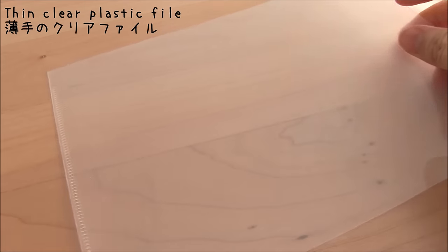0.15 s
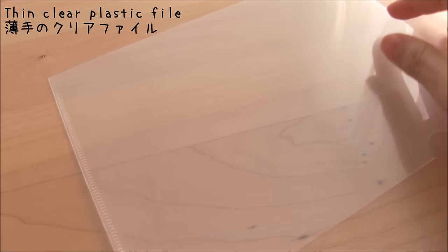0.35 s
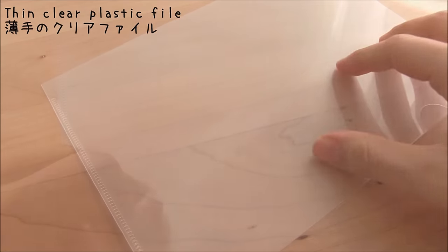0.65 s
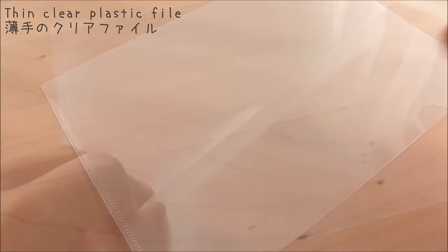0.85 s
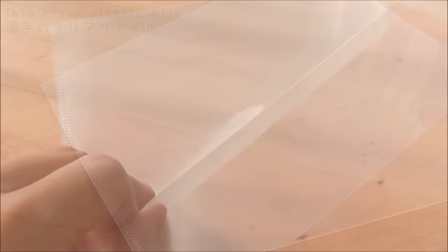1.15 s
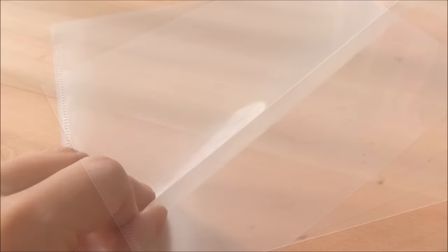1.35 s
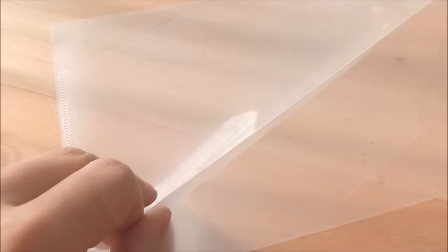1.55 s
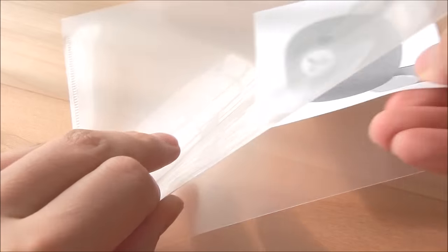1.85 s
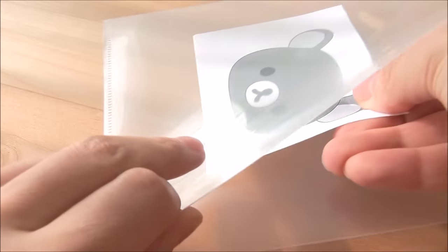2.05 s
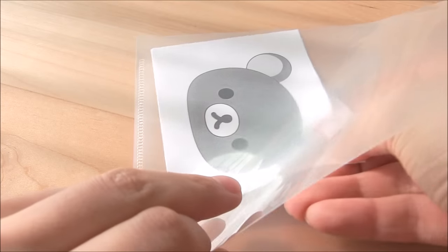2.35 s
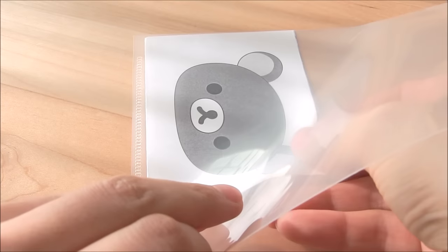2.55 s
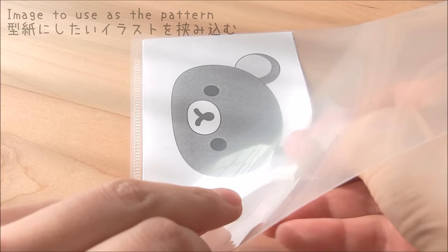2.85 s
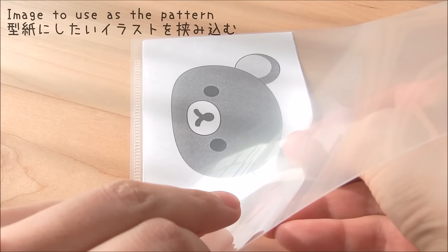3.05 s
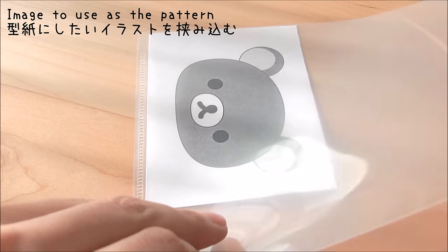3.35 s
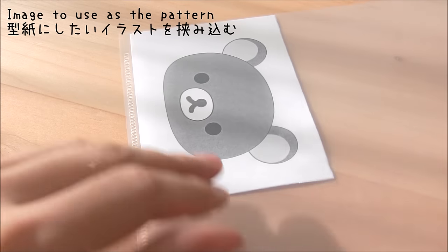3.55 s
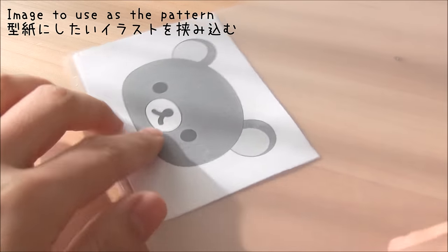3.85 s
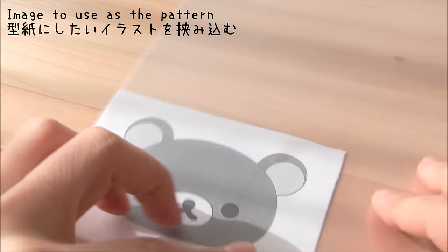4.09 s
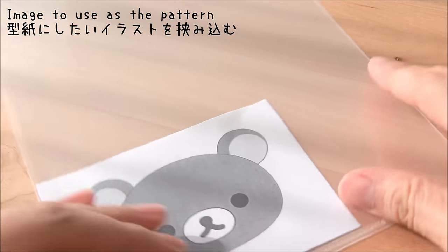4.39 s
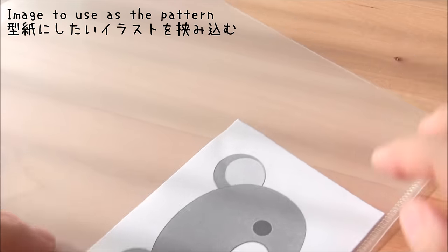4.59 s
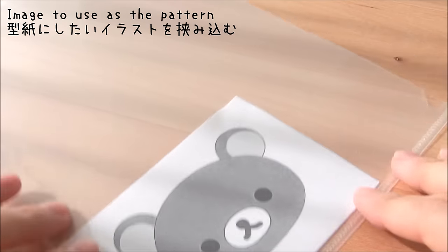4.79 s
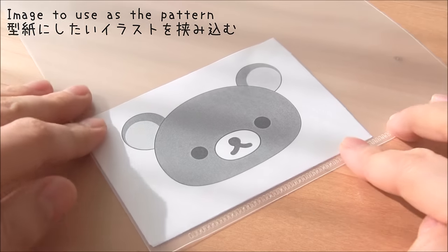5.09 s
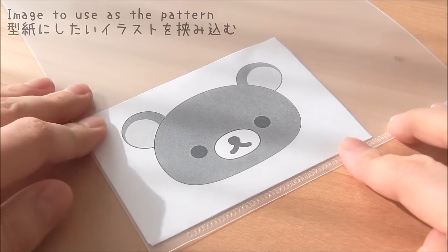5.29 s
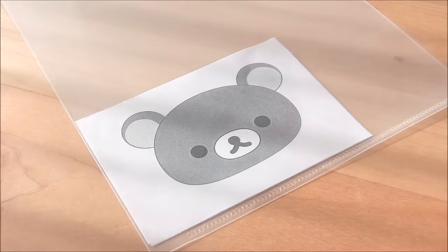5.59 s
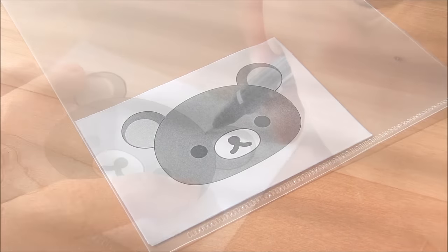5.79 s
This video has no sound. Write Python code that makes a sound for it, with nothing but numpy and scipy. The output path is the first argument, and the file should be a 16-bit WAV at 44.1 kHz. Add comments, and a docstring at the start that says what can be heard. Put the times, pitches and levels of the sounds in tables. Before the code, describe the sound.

A thin plastic folder snaps and ticks on a wooden table, paper slides in with a hiss, loud cracks follow, then soft swishes.

```python
"""A thin clear plastic folder is lifted open on a wooden table: the film snaps as it buckles, ticks at its
edges and rustles where its leaves rub, all as bursts of damped modes and filtered friction noise.
A sheet of paper then slides in, scraping and hissing; louder snaps follow as the folder is let go, and
gliding swishes of resonant noise turn it round on the wood, until one faint last brush.
Thuds ring the table top, a small room answers with decaying noise, and a soft hiss lies under it all."""
import sys
import numpy as np
from scipy import signal
from scipy.fft import rfft, irfft, next_fast_len
from scipy.io import wavfile
from scipy.ndimage import map_coordinates

SR = 44100
rng = np.random.default_rng(int(sys.argv[2]) if len(sys.argv) > 2 else 0)


def to_wav(s):
    """Save 16-bit WAV."""
    ch = np.atleast_2d(s).T  # columns
    pcm = np.round(np.clip(ch, -1, 1) * 32767)  # PCM
    wavfile.write(sys.argv[1], SR, pcm.astype(np.int16))


N = 261503

# left-right correlation of sounds by default: (frequency [Hz], correlation [0-1])
NEAR_CORRELATION = [(60, 1), (250, 0.8), (600, 0.53), (1500, 0.87), (4000, 0.76), (12000, 0.72)]


def from_db(db):
    """Amplitude gain is ten to the power of the level over twenty."""
    return 10 ** (np.asarray(db) / 20)


def rms_one(x):
    """Normalise to unit mean power."""
    return x / np.sqrt(np.mean(x ** 2) + 1e-20)


def at_hz(points, hz):
    """Interpolate a table linearly over log frequency, as octaves are spaced."""
    freqs, values = np.transpose(points)
    return np.interp(np.log(np.maximum(hz, 1)), np.log(freqs), values)


def panned(x, pan_db):
    """Intensity stereo: a level difference, left over right, leans the sound to one side."""
    return x * from_db([[pan_db / 2], [-pan_db / 2]])


def add(out, s, sound):
    """Superposition: sum a sound into the mix from a given time [s]."""
    at = max(round(s * SR), 0)
    out[:, at:at + sound.shape[-1]] += sound[..., :N - at]


def stroke(start, end, rise_s, fall_s):
    """Envelope of one movement: a sine-squared rise from the start, a hold until the end, then a fall."""
    t = np.arange(N) / SR
    ramp = np.minimum((t - start) / rise_s, 1 - (t - end) / fall_s)
    return np.sin(np.pi / 2 * np.clip(ramp, 0, 1)) ** 2


def resonate(x, hz, width_hz):
    """A damped mode: a two-pole resonance with unit gain at its peak."""
    r = np.exp(-np.pi * width_hz / SR)
    zeros = np.array([1, 0, -1]) * (1 - r * r) / 2
    poles = [1, -2 * r * np.cos(2 * np.pi * hz / SR), r * r]
    return signal.lfilter(zeros, poles, x)


def coloured(pair, colour, tilt_db=0, correlation=NEAR_CORRELATION):
    """Mid-side mixing turns two unrelated signals into a partly correlated, filtered stereo pair; rms 1."""
    length = pair.shape[-1]
    size = next_fast_len(length)
    hz = np.arange(size // 2 + 1) * SR / size
    alike = np.clip(at_hz(correlation, hz), 0, 1)
    # the tilt [dB per octave] acts above 500 Hz
    gain = from_db(at_hz(colour, hz) + tilt_db * np.log2(np.maximum(hz, 500)))
    mid, side = rfft(pair, size) * gain
    both = np.sqrt(1 + alike) * mid + np.sqrt(1 - alike) * side * [[1], [-1]]
    without_rumble = both * hz / (hz + 20)
    return rms_one(irfft(without_rumble, size)[:, :length])


def friction(size, slips_per_s, spread_db, smooth):
    """Stick-slip noise: random slips of uneven strength over the smooth noise of countless smaller ones."""
    happens = rng.random((2, size)) < slips_per_s / SR
    strength = from_db(spread_db * np.minimum(rng.exponential(1, (2, size)), 3))
    slips = happens * strength * rng.choice([-1, 1], (2, size))
    return rms_one(slips) + smooth * rng.standard_normal((2, size))


def judder(per_s, depth_db):
    """Amplitude modulation: the random gain of a surface that grips and lets go."""
    knots = rng.standard_normal(N)
    return from_db(depth_db * np.interp(np.arange(N) * per_s / SR, np.arange(N), knots))


def shifting(x, per_s, per_octave, depth_db):
    """Time-varying filtering: contact wanders over the bent film, so patches of the spectrum swell and fade."""
    hz, s, spectrum = signal.stft(x, SR, nperseg=256)
    places = np.meshgrid(np.log2(1 + hz / hz[1]) * per_octave, s * per_s, indexing="ij")
    patches = map_coordinates(rng.standard_normal((64, 1024)), places, order=1, mode="wrap")
    return signal.istft(spectrum * from_db(depth_db * patches), SR)[1][:, :N]


def pop(hz, share, order=2):
    """Impulse response of cascaded modes, of width share * hz: a swing that builds and dies; peak 1.

    A higher order is rounder."""
    swing = signal.unit_impulse(SR // 5) + 1e-18
    for _ in range(order):
        swing = resonate(swing, hz, share * hz)
    return swing / np.abs(swing).max()


def air(low_db=-60.5, lift_db=7):
    """Stationary filtered noise: a soft background hiss that moves smoothly between two levels."""
    # stretches at the higher level: (start [s], end [s], rise [s], fall [s])
    lifts = [(.3, 2.98, 0.31, 0.59), (5.65, 5.93, .025, .1)]
    # spectrum: (frequency [Hz], relative density [dB])
    hiss_colour = [(15, -38), (25, -12), (70, -10.5), (166, -6), (217, 0), (293, -5), (394, -4), (476, -7),
                   (591, -5.5), (863, -10), (1610, -11), (3920, -17), (7510, -20.5), (13600, -26.5),
                   (16000, -31.5)]
    # left-right correlation of the diffuse hiss: (frequency [Hz], correlation [0-1])
    diffuse_correlation = [(60, .5), (200, 0.38), (450, 0.05), (1300, 0.18), (4400, 0.58), (12000, .6)]
    lifted = sum(stroke(*lift) for lift in lifts)
    hiss = coloured(rng.standard_normal((2, N)), hiss_colour, correlation=diffuse_correlation)
    return from_db(low_db + lift_db * lifted) * hiss


def room(x, first_s=0.0028, build_s=0.00084):
    """Reverberation as convolution with diffuse noise, each octave with its own exponential envelope."""
    # time for a 60 dB decay; a negative one makes the top octave grow until the response ends:
    # (frequency [Hz], time [s])
    decay_times = [(100, 0.63), (400, 0.2), (1200, 0.17), (3000, 0.78), (6000, 0.5), (11000, -2)]
    # strength of the echo: (frequency [Hz], level [dB])
    echo_levels = [(100, -15.5), (300, -1), (700, -5.5), (1400, -9), (3000, -18.5), (6000, -9.5),
                   (14000, -22)]
    t = np.arange(SR * 2 // 3) / SR
    edges = 62.5 * 2. ** np.arange(9)
    build = 1 - np.exp(-np.maximum(t - first_s, 0) / build_s)
    echo = 0
    for low, high in zip(edges, edges[1:]):
        hz = np.sqrt(low * high)
        noise = coloured(rng.standard_normal((2, len(t))), [(1, 0), (SR, 0)])
        fade = from_db(-60 * t / at_hz(decay_times, hz)) * build
        band = signal.sosfilt(signal.butter(2, [low, high], "band", fs=SR, output="sos"), noise)
        echo = echo + band * fade / np.sqrt(np.sum(fade ** 2)) * from_db(at_hz(echo_levels, hz))
    return signal.fftconvolve(x, echo, axes=1)[:, :N]


def thuds(contact_s=0.0082):
    """Modal synthesis: soft blows of fingers and folder set the decaying modes of the table top ringing."""
    # blows: (time [s], level [dB])
    blows = [(.066, -50), (.752, -45), (2.338, -36.5), (2.386, -41), (3.258, -47), (3.474, -51),
             (3.998, -49), (4.21, -37.5), (5.068, -59)]
    # modes of the table top: (frequency [Hz], relative level [dB], time for a 60 dB decay [s])
    modes = [(100, -14, 0.16), (136, -7, 0.31), (183.3, -9, 0.3), (231.7, 2.5, 0.14), (287.4, -6.5, .12),
             (350, 0.5, .07)]
    out, t = np.zeros((2, N)), np.arange(SR // 3) / SR
    ring = 0
    for k, (hz, db, t60) in enumerate(modes):
        sign = (-1) ** k
        ring = ring + sign * from_db(db - 60 * t / t60) * np.sin(2 * np.pi * hz * t)
    for s, db in blows:
        add(out, s, from_db(db) * ring * (1 - np.exp(-t / contact_s)))
    return out


def landings(pan_db=0):
    """A lightly damped mode: film that drops flat cushions on the air under it and rings on one note."""
    # (time [s], peak level [dB], pitch [Hz], width [Hz])
    drops = [(.492, -57.5, 990, 45), (3.54, -44.5, 968, 26), (4.2113, -43.5, 1080, 140)]
    out = np.zeros((2, N))
    for s, db, hz, width_hz in drops:
        add(out, s, panned(from_db(db) * pop(hz, width_hz / hz), pan_db))
    return out


def turning(width_hz=800, skirt_hz=2600, edge_hz=2900, side_db=-8, pan_db=-1):
    """Heterodyned friction: film skims the wood grain in swishes of gliding pitch over a soft hiss."""
    # shoves: (start [s], end [s], swish level [dB], hiss level [dB], first pitch [Hz], last pitch [Hz])
    shoves = [(3.852, 3.99, -61.5, -65.5, 3860, 3455), (3.96, 4.189, -67, -57, 5200, 4930),
              (4.248, 4.39, -53, -54.5, 4850, 4520), (4.431, 4.502, -55, -59, 3950, 3730),
              (4.56, 4.639, -54, -59.5, 4150, 4190), (4.782, 4.978, -50, -53, 4350, 4386),
              (5.011, 5.101, -54.5, -57.5, 4330, 4200)]
    # spectrum of the hiss: (frequency [Hz], relative density [dB])
    wood_colour = [(70, -22), (128, 11.5), (165, 3), (230, 4), (400, -15), (800, -5.5), (1100, -0.5),
                   (2300, -3), (5000, 2.5), (7500, 3.5), (11000, -0.5), (16000, -8.5)]
    rise_s, fall_s = 0.048, 0.11
    random_phase = np.exp(2j * np.pi * rng.random(N))
    slips = friction(N, slips_per_s=1800, spread_db=3.5, smooth=0.79) * random_phase
    # every slip rings briefly; the carrier below moves the ring to the pitch of the moment
    rings = signal.lfilter(*signal.butter(2, skirt_hz, fs=SR), slips)
    rings = signal.lfilter(*signal.butter(1, width_hz / 2, fs=SR), rings)
    hiss = coloured(friction(N, slips_per_s=4500, spread_db=4.5, smooth=1.0), wood_colour)
    # the thin film radiates little below its edge pitch
    radiation = signal.butter(4, edge_hz, "high", fs=SR, output="sos")
    out, grip = 0, judder(per_s=42, depth_db=0.6)
    for start, end, swish_db, hiss_db, first_hz, last_hz in shoves:
        pitch = np.interp(np.arange(N) / SR, [start, end], [first_hz, last_hz])
        carrier = np.exp(2j * np.pi * np.cumsum(pitch) / SR)
        mid, side = np.real(rings * carrier)
        swish = signal.sosfilt(radiation, mid + from_db(side_db) * side * [[1], [-1]])
        rubbing = from_db(swish_db) * rms_one(swish) * grip + from_db(hiss_db) * hiss
        out = out + stroke(start, end, rise_s, fall_s) * rubbing
    return panned(out, pan_db)


def brushes(ring_share=0.17, ring_db=5, pan_db=-1):
    """Resonant friction: two leaves graze in swelling strokes and the bend of the film favours one pitch."""
    # (strongest time [s], rise [s], fall [s], relative level [dB], tilt [dB per octave], ring pitch [Hz])
    grazes = [(.02, 0.088, 0.054, -41, 2.5, 3420), (.239, 0.03, 0.11, -54.5, -1, 3220),
              (.39, 0.02, .032, -59.5, 1.5, 9500), (2.566, .03, .054, -50, 2.5, 2860),
              (2.75, 0.052, 0.052, -53, 2, 3500), (2.831, 0.051, 0.04, -48.5, 2.5, 3970),
              (3.201, 0.035, .03, -53, 1, 4200), (3.228, 0.017, 0.05, -44, 4, 4550),
              (3.318, .045, 0.035, -45.5, 0, 2090), (3.48, .04, 0.058, -45.5, 0.5, 3400),
              (3.524, 0.04, 0.017, -42.5, 2.1, 1440), (5.49, 0.019, 0.054, -60, 5, 3940)]
    # spectrum before the tilt: (frequency [Hz], relative density [dB])
    graze_colour = [(60, -14), (150, 7), (500, 1), (1300, 0.5), (2000, 1), (3400, -4), (5000, -6.5),
                    (8000, -10.5), (12000, -17), (16000, -30)]
    out, size = np.zeros((2, N)), SR // 4
    for top, rise, fall, db, tilt_db, ring_hz in grazes:
        t = max(top - rise, 0) + np.arange(size) / SR
        swell = np.sin(np.pi / 2 * np.interp(t - top, [-rise, 0, fall], [0, 1, 0]))
        slips = friction(size, slips_per_s=3000, spread_db=4.0, smooth=0.61)
        graze = coloured(slips, graze_colour, tilt_db)
        ring = from_db(ring_db) * resonate(graze, ring_hz, ring_share * ring_hz)
        add(out, t[0], from_db(db) * swell * rms_one(graze + ring))
    return panned(out, pan_db) * judder(per_s=140, depth_db=2.25)


def paper(catch_db=1, catch_hz=3000, catch_width_hz=1500, pan_db=-1.5):
    """Stick-slip sliding: the leading edge scrapes and catches in tiny pops as the face hisses on the film."""
    # scrapes of the edge: (start [s], end [s], relative level [dB])
    edge_scrapes = [(1.687, 1.78, -57.5), (1.801, 1.85, -54), (1.889, 1.955, -41.5), (2.017, 2.036, -42.5),
                    (2.076, 2.317, -58)]
    # spectra of edge and face: (frequency [Hz], relative density [dB])
    edge_colour = [(60, -10), (120, -5.5), (280, -12.5), (420, -1), (620, -6.5), (800, 1), (1250, 2),
                   (1800, -2.5), (2200, -4.5), (2600, -1.5), (3300, -6), (4300, -3), (7700, -19),
                   (15000, -32)]
    face_colour = [(100, -26), (600, -17), (1500, -5.5), (2600, -4.5), (4500, -1.5), (7000, -5),
                   (10000, -7.5), (13000, -9), (16000, -17.5)]
    scrape = coloured(friction(N, slips_per_s=1700, spread_db=4.5, smooth=0.91), edge_colour)
    scrape = scrape * judder(per_s=96, depth_db=3.5)
    catches = coloured(friction(N, slips_per_s=220, spread_db=0.5, smooth=0.45), edge_colour)
    for _ in range(2):
        catches = resonate(catches, catch_hz, catch_width_hz)
    edge = scrape + from_db(catch_db) * rms_one(catches)
    face = coloured(friction(N, slips_per_s=4000, spread_db=2.5, smooth=1.0), face_colour)
    face = face * judder(per_s=70, depth_db=0.7)
    scraping = sum(from_db(db) * stroke(start, end, rise_s=0.036, fall_s=0.097)
                   for start, end, db in edge_scrapes)
    # the sheet is pushed into the pocket in one stroke
    pushing = from_db(-45.5) * stroke(1.635, 2.55, rise_s=0.46, fall_s=.065)
    return panned(scraping * edge + pushing * face, pan_db)


def ticks(gain_db=-2, share=0.89, low_ratio=0.39, low_db=-12, shiver_db=-13, shiver_s=0.0028,
          rustle_db=-30, rustle_s=0.049, delay_s=.0008, crack_db=-14, crack_hz=9500, crack_share=0.26):
    """Impulsive modes: an edge or crease flicks two modes and a thin crack; resonant noise follows.

    The wave comes back through the film as a brief shiver and fades in a faint rustle."""
    # (time before the delay [s], level before the gain [dB], pitch [Hz], left over right [dB])
    flicks = [(.051, -18, 2380, 1), (.0918, -29, 1480, -4), (0.606, -37, 6000, -8), (.617, -28, 4750, -5),
              (0.7339, -18, 6300, 3), (0.7427, -25.5, 6040, -2), (1.45, -35, 4080, 7),
              (1.821, -32, 5000, -11), (1.8875, -22, 2920, -5), (1.9285, -28, 2640, 0),
              (1.9482, -30, 2580, -3), (1.978, -28, 2530, -2), (2.2213, -30, 3140, -1.5),
              (2.256, -26, 5660, -4), (3.798, -30, 3580, -2), (3.8167, -35.5, 3960, 0),
              (3.863, -38, 5470, -5), (4.21, -38, 1900, 3), (4.449, -26.5, 4200, 1),
              (4.7765, -38.5, 4100, 0), (4.9141, -28, 4700, -1)]
    out, t = np.zeros((2, N)), np.arange(SR // 7) / SR
    fade = from_db(shiver_db) * np.exp(-t / shiver_s) + from_db(rustle_db) * np.exp(-t / rustle_s)
    crack = from_db(crack_db) * pop(crack_hz, crack_share)
    for s, db, hz, pan_db in flicks:
        flick = pop(hz, share) + from_db(low_db) * pop(low_ratio * hz, share) + crack
        noise = rng.standard_normal((2, len(t)))
        shiver = rms_one(resonate(noise, hz, share * hz)) * fade
        for part in flick, shiver:
            add(out, s + delay_s, panned(from_db(db + gain_db) * part, pan_db))
    return out


def snaps(crack_db=-20, crack_hz=5600, crack_share=0.35, rattle_share=1.45, overtone_width=1.64):
    """Buckling: film flips over, swinging two opposed modes with a thin crack, and rattles briefly."""
    # film buckles or slaps down: (time [s], main mode level [dB], pitch [Hz], overtone pitch [Hz],
    # overtone level over main [dB], rattle level [dB], rattle decay [s], left over right [dB])
    buckles = [(.031, -28.5, 1190, 1690, -13, -45, 0.027, 4), (0.0602, -33, 560, 1310, -5, -48, 0.04, -2),
               (.4895, -54, 930, 2260, -3, -52.5, 0.047, -3), (1.4499, -43.5, 600, 1400, -2, -49, 0.036, 0),
               (2.3321, -18.5, 643, 1180, -8.5, -31, 0.024, -4),
               (2.3365, -17.5, 970, 1860, -7, -31.5, 0.032, 1),
               (2.3439, -25.5, 383, 740, -3, -50, 0.024, -2),
               (2.4121, -16, 2400, 3560, -0.5, -39.5, 0.027, -3),
               (3.2356, -9, 1420, 2890, -5, -35, 0.014, -4.5),
               (3.2577, -10, 1340, 2370, -10, -41, 0.049, 1.5),
               (3.2581, -33.5, 346, 740, 1.5, -58.5, 0.036, -1),
               (3.3359, -29.5, 1160, 2300, -23, -46.5, 0.053, -4),
               (3.3544, -35, 820, 1520, -7, -56, 0.034, -3),
               (3.5355, -24, 980, 1410, -13, -49, 0.022, -4.5)]
    # spectrum of the rattle before its resonance: (frequency [Hz], relative density [dB])
    rattle_colour = [(40, -19), (130, 10), (600, 4.5), (1200, 0), (1800, -2), (2700, -1.5), (4000, -10),
                     (16000, -16)]
    width_at_1khz = 536  # width of a mode [Hz]; it grows with the square root of pitch
    out, t = np.zeros((2, N)), np.arange(SR // 4) / SR
    crack = from_db(crack_db) * pop(crack_hz, crack_share)
    for s, db, hz, overtone_hz, overtone_db, rattle_db, rattle_s, pan_db in buckles:
        share, overtone_share = width_at_1khz / np.sqrt(1000 * np.array([hz, overtone_hz]))
        overtone = from_db(overtone_db) * pop(overtone_hz, overtone_width * overtone_share, order=4)
        swing = pop(hz, share) - overtone
        add(out, s, panned(from_db(db) * (swing + crack), pan_db))
        slips = friction(len(t), slips_per_s=590, spread_db=3, smooth=0.84)
        rattle = rms_one(resonate(coloured(slips, rattle_colour), hz, rattle_share * hz))
        add(out, s, panned(from_db(rattle_db) * rattle * np.exp(-t / rattle_s), pan_db))
    return out


def scene():
    """Superposition of the handling, its reverberation and the background hiss."""
    rubbing = shifting(brushes() + paper() + turning(), per_s=55, per_octave=5, depth_db=2.5)
    handling = snaps() + landings() + ticks() + thuds() + rubbing
    return handling + room(handling) + air()


def record(dry):
    """Band limiting: a steep elliptic low-pass cuts the top."""
    low_pass = signal.ellip(10, .1, 80, 15900, fs=SR, output="sos")
    return signal.sosfilt(low_pass, dry)


dry = scene()
out = record(dry)
to_wav(out)
```